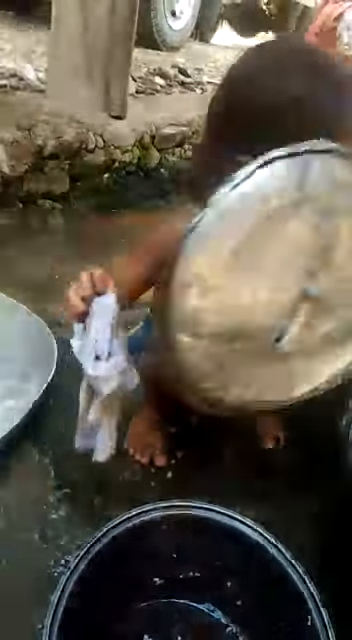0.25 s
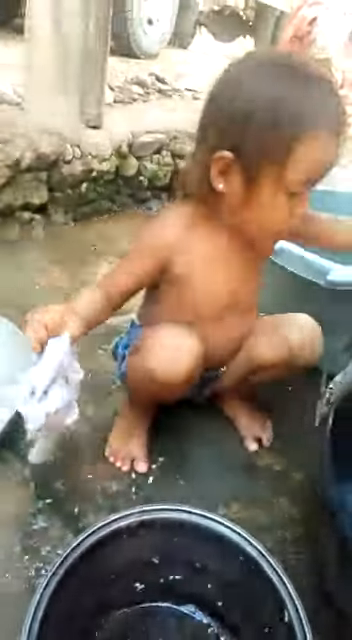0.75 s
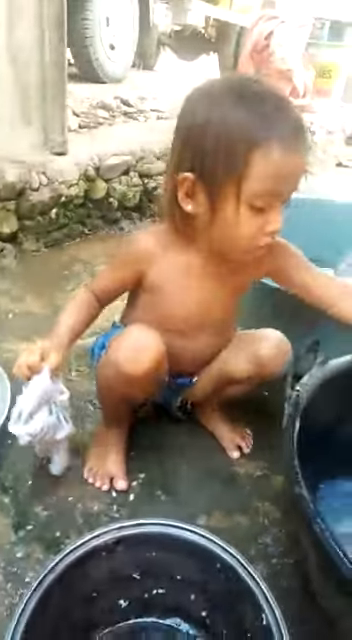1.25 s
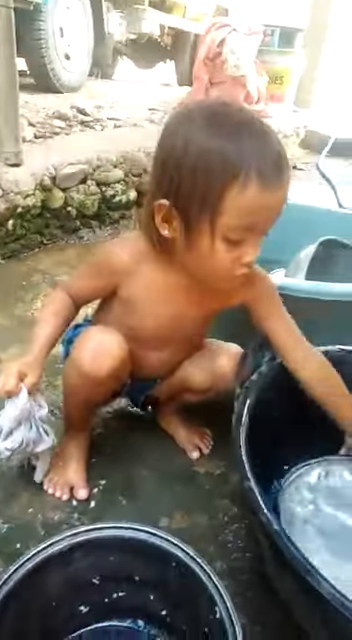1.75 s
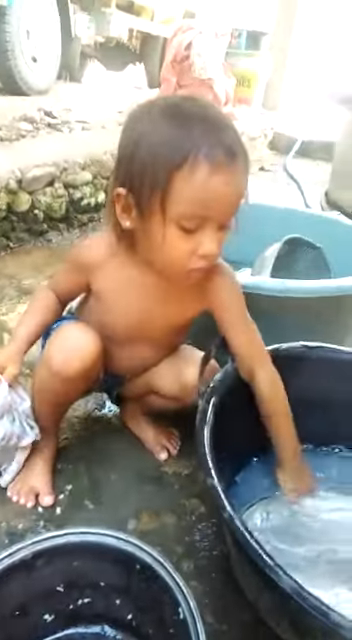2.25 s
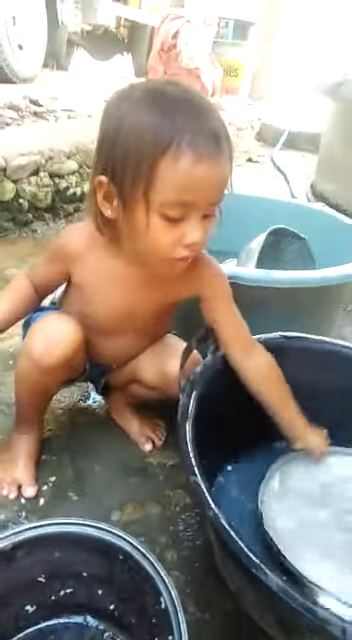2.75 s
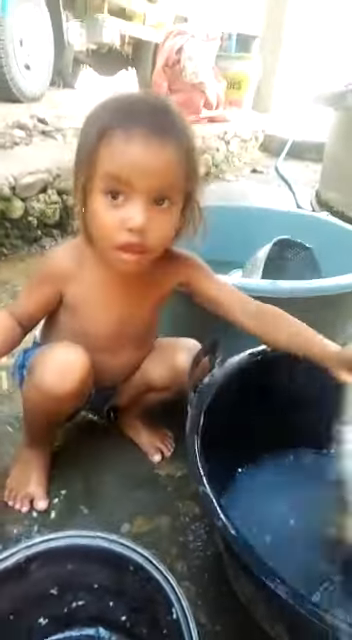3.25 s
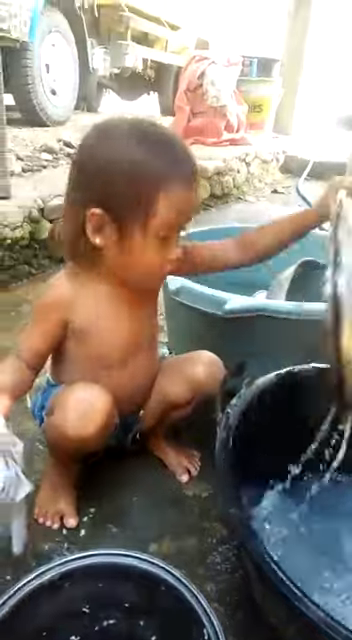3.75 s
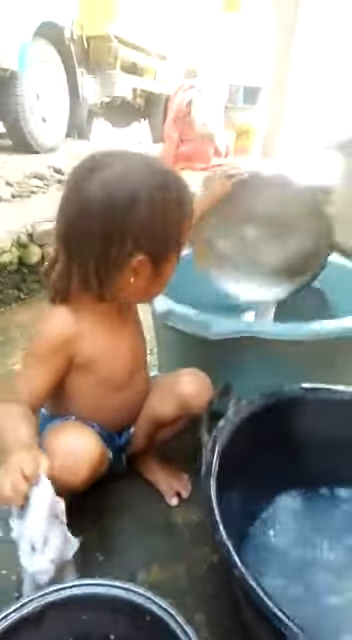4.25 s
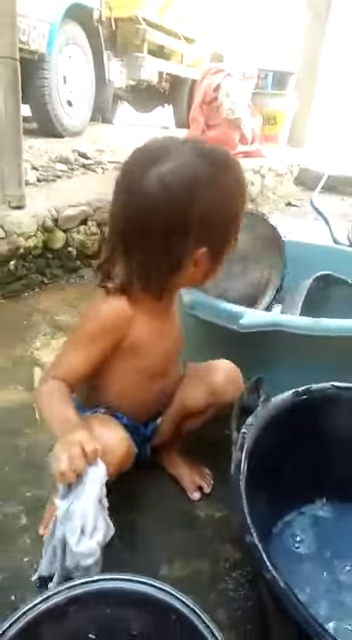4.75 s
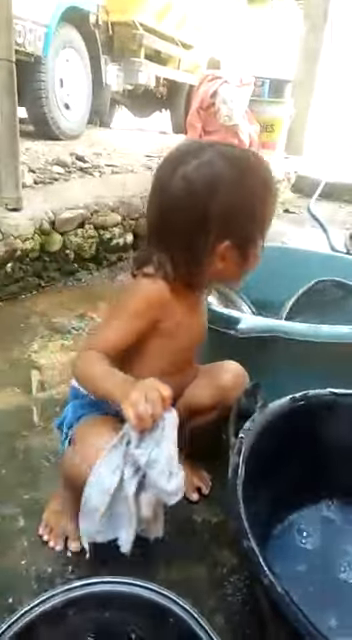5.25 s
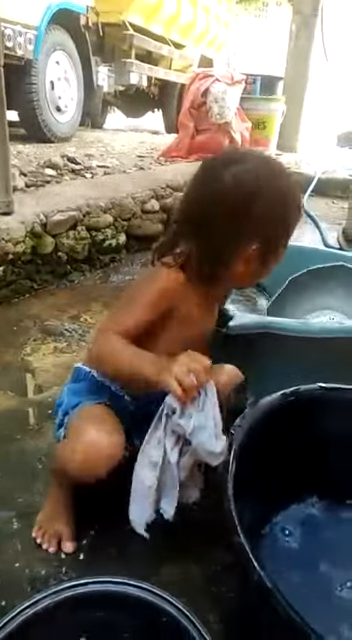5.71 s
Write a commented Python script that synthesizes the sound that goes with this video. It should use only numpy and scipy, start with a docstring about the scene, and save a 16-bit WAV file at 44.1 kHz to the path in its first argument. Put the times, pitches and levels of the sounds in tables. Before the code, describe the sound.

Close phone pickup in an open yard. After a very quiet first second with faint scraping, a thin metal lid knocks sharply on a plastic basin, then drags, squeaks and clinks through water. A quieter patch around three and a half to four seconds holds small squeaks and drips, then harder clanks and scrapes return, the loudest just after five seconds, over a faint outdoor rush.

```python
"""In a yard, near a phone, a thin metal lid is rinsed in plastic basins.
Knocks on rims and pans are bursts of noise coloured by the lid's resonances, with basin thuds, treble cracks and
damped tones. Between them the lid drags through water and along plastic: resonant friction noise, slips and hiss.
Gliding hoarse squeaks, short rough skids, a scrubbing wet cloth and ticking drops lie over a far outdoor rush."""
import sys
import numpy as np
from scipy import signal
from scipy.fft import rfft, irfft, next_fast_len
from scipy.io import wavfile
from scipy.ndimage import uniform_filter1d, map_coordinates

SR = 44100
rng = np.random.default_rng(int(sys.argv[2]) if len(sys.argv) > 2 else 0)


def wav_record(signal):
    """Record a signal, one row per channel, as 16-bit PCM in the file named by sys.argv[1]."""
    frames = np.transpose(np.atleast_2d(signal))
    bounded = np.clip(frames, -1, 1)
    # unit amplitude maps onto the largest positive 16-bit level
    quanta = np.round(bounded * 32767).astype(np.int16)
    wavfile.write(sys.argv[1], SR, quanta)


N = 263718  # samples

# Resonances of the thin lid: (centre_hz, width_hz, level_db)
LID_MODES = [(455, 130, -5.5), (625, 16.7, 1), (732, 46, -3), (910, 56, 0.5), (1096, 160, -3),
             (1270, 95, 2), (1437, 100, -1.5), (1624, 51, 3), (1904, 247, -1), (2210, 276, 0),
             (2540, 147, -1), (2823, 165, -4), (3124, 310, -9)]
# Overall colour of the lid's sound: (frequency_hz, density_db per Hz)
LID_COLOUR = [(60, -75.5), (200, -46), (400, -2), (700, -1), (2000, -4), (2800, -8.5), (4000, -22),
              (9000, -39)]
# Colour of sloshing water and the basin wall: (frequency_hz, density_db per Hz)
SLOSH_COLOUR = [(24, -46), (40, -18.5), (161, -8.5), (220, -8.5), (284, -3.5), (330, 1), (430, -0.5),
                (730, -120)]
# Colour of the scraping hiss: (frequency_hz, density_db per Hz)
HISS_COLOUR = [(1760, -8.5), (3000, -2), (3700, -4), (4330, -5.5), (5920, -2.5), (6790, -1), (9290, -1),
               (14300, -13)]
GRIP_OCT = 0.82  # width of the brightest part of a drag, octaves


def amp(db):
    """Gain of a level in dB."""
    return 10 ** (np.asarray(db) / 20)


def unit(x):
    """x at rms 1."""
    return x / np.sqrt(np.mean(np.abs(x) ** 2) + 1e-20)


def along(points, hz):
    """Curve through (frequency, value) points, straight on a log frequency axis."""
    f, v = np.transpose(points)
    return np.interp(np.log(hz + 1), np.log(f + 1), v)


def wobble(rate):
    """A smooth random curve with `rate` knots a second."""
    knots = rng.standard_normal(int(N * rate / SR) + 4)
    return map_coordinates(knots, [np.arange(N) * rate / SR])


def filtered(x, response):
    """x passed through a complex response of frequency."""
    size = next_fast_len(x.shape[-1] + 4096)
    spectrum = rfft(x, size) * response(np.fft.rfftfreq(size, 1 / SR))
    return irfft(spectrum, size)[..., :x.shape[-1]]


def modes(table, f):
    """Causal response of (centre, width, level) resonances, added with alternating sign."""
    total = 0
    for k, (centre, width, db) in enumerate(table):
        damping = 1j * f * width
        total = total + (-1) ** k * amp(db) * damping / (centre * centre - f * f + damping)
    return total


def hump(hz, centre_hz, octaves):
    """A bell-shaped gain around a centre on a log axis."""
    return np.exp(-.5 * (np.log2((hz + 1) / centre_hz) / octaves) ** 2)


def grainy(depth_db, rate):
    """Noise at rms 1 whose level wanders at random, `rate` knots a second."""
    return unit(amp(depth_db * wobble(rate)) * rng.standard_normal(N))


def burst(gain):
    """Noise of rms 1 with the given gain at each frequency."""
    phase = np.exp(2j * np.pi * rng.random(len(gain)))
    return unit(irfft(gain * phase * rng.rayleigh(size=len(gain))))


def random_patches(shape, wide, long):
    """Random field over bands and frames, smoothed along both, at rms 1."""
    field = uniform_filter1d(rng.standard_normal(shape), size=wide, axis=0)
    return unit(uniform_filter1d(field, size=long, axis=1))


def patchy(x, depth_db, wide, long):
    """x with patches of random gain: single bands come and go."""
    z = signal.stft(x, nperseg=256)[2]
    z = z * amp(depth_db * random_patches(z.shape, wide, long))
    return unit(signal.istft(z, nperseg=256)[1][:N])


def thin(x):
    """A small thin plate radiates hardly any bass: a steep low cut near 260 Hz."""
    return filtered(x, lambda f: (1j * f / (1j * f + 260)) ** 3)


def stroke_db(start, swell, hold, t60):
    """Level of one stroke under its peak: swell, hold, fade."""
    swell_db = 22  # distance under the peak at the start
    t = np.arange(N) / SR - start - swell
    rise = swell_db * (np.maximum(-t, 0) / max(swell, .001)) ** 2
    fade = 60 * np.maximum(t - hold, 0) / max(t60, .02)
    return -np.minimum(rise + fade, 200)


def yard():
    """Far outdoor rush of air and water: coloured noise with a slightly wandering level."""
    # Colour of the rush: (frequency_hz, density_db per Hz)
    yard_colour = [(24, -40), (40, -5), (80, -1.5), (151, -19), (188, -13), (529, -8.5), (629, -8.5),
                   (694, -11.5), (3880, -28), (14300, -33)]
    rush = unit(filtered(rng.standard_normal(N), lambda f: amp(along(yard_colour, f))))
    return amp(-78.5 + 0.45 * wobble(14.0)) * rush


def dragging():
    """Gains of rub, hiss and slosh, and the brightest part, weighted by the power of each stroke."""
    # Floor between strokes: rub_db, bright_hz, hiss_db, slosh_db
    idle_levels = (-79.5, 892, -93.5, -88.5)
    # Drags: (start_s, swell_s, hold_s, t60_s, rub_db, bright_hz, hiss_db, slosh_db)
    drag_strokes = [(0, 0.00067, 0.029, 0.41, -55.5, 1380, -58, -82),
                    (.25, 0.11, 0.017, 0.76, -73, 1390, -92, -85),
                    (1.109, 0.061, 0.055, 0.45, -50, 1390, -57, -62.5),
                    (1.353, 0.031, 0.097, 0.41, -59, 1124, -69, -70),
                    (1.575, 0.019, 0.071, 0.43, -63, 1390, -82, -68),
                    (1.69, 0.038, 0.048, 0.33, -50, 1100, -78, -88),
                    (1.757, 0.013, 0.063, 0.42, -50.5, 1170, -61, -90),
                    (1.968, 0.017, 0.016, 0.31, -43.5, 1123, -67, -63),
                    (2.016, 0.028, 0.019, 0.58, -53.5, 1660, -74, -76),
                    (2.295, 0.057, 0.063, 0.33, -44, 1324, -52, -64),
                    (2.415, 0.048, .05, 0.2, -49, 1450, -51.5, -92),
                    (2.522, 0.017, 0.053, 0.5, -52.5, 1200, -64, -92),
                    (2.67, 0.056, 0.042, 0.55, -55, 920, -72, -72),
                    (2.778, 0.08, 0.034, 0.22, -47.5, 1334, -55, -79),
                    (2.889, 0.016, 0.048, 0.38, -46.5, 1510, -53.5, -80),
                    (3.061, .03, 0.036, .2, -48, 804, -70, -68),
                    (3.172, 0.048, .16, 0.45, -60.5, 1300, -70.5, -90),
                    (3.343, 0.074, .01, 1.5, -51, 1760, -60.5, -94),
                    (3.47, 0.075, 0.049, 0.94, -61.5, 1280, -56.5, -71),
                    (3.58, .05, .11, 0.22, -60, 1910, -60.5, -85),
                    (4.03, 0.033, .05, 0.38, -64, 1070, -73.5, -96),
                    (4.114, 0.035, 0.11, 0.13, -77, 1410, -93, -87),
                    (4.332, 0.027, .05, .2, -81, 1570, -77.5, -79),
                    (4.413, 0.013, 0.045, 0.25, -44.5, 1600, -57, -83),
                    (4.653, 0.022, 0.034, 0.67, -48.5, 910, -61, -83),
                    (4.815, 0.017, 0.029, 0.48, -44.5, 1430, -50, -68),
                    (4.969, 0.018, 0.015, 0.5, -61, 850, -80, -73),
                    (5.098, 0.055, 0.086, 0.89, -45, 1460, -67.5, -69),
                    (5.172, 0.061, 0.058, 0.43, -38.5, 990, -54, -59),
                    (5.386, 0.041, 0.044, 0.69, -54, 1600, -69, -69),
                    (5.505, 0.036, 0.072, 0.85, -48.5, 1230, -65, -63.5),
                    (5.598, 0.037, 0.033, 1.8, -44.5, 1022, -59.5, -69),
                    (5.873, 0.021, 0.017, .12, -47, 1800, -62, -72),
                    (5.917, .015, .05, .4, -48, 1380, -62.5, -66)]
    hiss_steeper = 1.5  # the hiss swells and fades by more dB than the rub
    rub_db, hz, hiss_db, slosh_db = idle_levels
    rub, hiss, slosh = (np.full(N, amp(2 * db)) for db in (rub_db, hiss_db, slosh_db))  # powers
    bright = rub * hz
    for *shape, rub_db, hz, hiss_db, slosh_db in drag_strokes:
        db = stroke_db(*shape)
        power = amp(2 * (rub_db + db))
        rub, bright = rub + power, bright + power * hz
        hiss = hiss + amp(2 * (hiss_db + hiss_steeper * db))
        slosh = slosh + amp(2 * (slosh_db + db))
    return np.sqrt(rub), np.sqrt(hiss), np.sqrt(slosh), bright / rub


def slips(bright_hz, count):
    """Stick-slip: short damped tones, bending a little, scattered around the brightest part."""
    when, spread, size, bend = rng.random(count), *rng.standard_normal((3, count))
    start, t = (when * N).astype(int), np.arange(700) / SR
    hz = np.clip(bright_hz[start] * 2 ** (0.576 * spread * GRIP_OCT), 300, 3400)[:, None]
    cycles = hz * t * (1 + 4 * bend[:, None] * t)
    decay = amp(4.3 * size[:, None] - 60 * hz * t / 22)  # 60 dB down after 22 nominal cycles
    grain = decay * (1 - np.exp(-t / 0.00087)) * np.sin(2 * np.pi * cycles)
    places = start[:, None] + np.arange(700)
    return unit(np.bincount(places.ravel(), grain.ravel(), N)[:N])


def drone(rub_gain):
    """Scraping keeps the loaded basin's lowest air and wall resonances humming."""
    loaded_s, hum_db = 4.6, -11.5  # the lid reaches the loaded basin; hum relative to the rub gain
    basin_modes = [(429, 80, 1), (491, 76, -2)]  # (centre_hz, width_hz, level_db)
    hum = unit(filtered(grainy(5.9, 22), lambda f: modes(basin_modes, f) ** 2))
    return amp(hum_db) * rub_gain * (np.arange(N) / SR > loaded_s) * hum


def rubbing(bright_hz):
    """Friction noise through the lid's modes, its brightest part moving with the grip, plus slips."""
    rub = filtered(grainy(1.5, 160), lambda f: (0.55 + np.abs(modes(LID_MODES, f))) * amp(along(LID_COLOUR, f)))
    hz, t, z = signal.stft(rub, SR, nperseg=512)
    now = np.minimum((t * SR).astype(int), N - 1)
    z = z * (0.33 + hump(hz[:, None], bright_hz[now], GRIP_OCT))
    z = z * amp(3.5 * random_patches(z.shape, wide=2, long=9))  # narrow bands come and go
    z = z / uniform_filter1d(np.sqrt(np.mean(np.abs(z) ** 2, 0)), 15)  # even out the level
    steady = unit(signal.istft(z, SR, nperseg=512)[1][:N])
    return 0.7 * steady + 0.54 * slips(bright_hz, count=900)


def drag():
    """The lid drags: friction feeds its modes, water sloshes, plastic hisses and the loaded basin hums."""
    rub_gain, hiss_gain, slosh_gain, bright_hz = dragging()
    rub = rubbing(bright_hz)
    slosh = unit(filtered(grainy(2.5, 20), lambda f: amp(along(SLOSH_COLOUR, f))))
    hiss = filtered(grainy(1.6, 600), lambda f: amp(along(HISS_COLOUR, f)))
    hiss = patchy(hiss, depth_db=2.2, wide=8, long=5)
    slip_db = 2.47 * wobble(30)  # uneven friction
    hiss_db = 0.42 * slip_db + 1.9 * wobble(25)  # the hiss partly follows it
    lid = thin(rub_gain * amp(slip_db) * rub)
    return lid + slosh_gain * slosh + hiss_gain * amp(hiss_db) * hiss + drone(rub_gain)


def knocks():
    """Each contact rattles the lid near its centre pitch, thuds in the basin and cracks in the treble."""
    # Knocks: (start_s, level_db, centre_hz, base_decay_s, thud_db, crack_db); the last two relative to the level
    knock_list = [(0.009, -50, 1410, 0.15, -26, -25), (0.112, -54.5, 940, 0.21, -15.5, -19),
                  (0.203, -54, 1290, 0.16, -30, -32), (0.29, -59, 945, 0.2, -22, -25),
                  (0.364, -44, 1330, 0.037, -40, -20.5), (0.42, -55, 923, 0.13, -32, -35),
                  (1.005, -15.5, 590, 0.14, -23, -25), (1.408, -19.5, 1130, 0.12, -22.5, -18.5),
                  (1.434, -36, 1290, 0.09, -18, -4.5), (1.588, -30, 590, 0.093, -22, -29),
                  (1.723, -41, 1130, 0.32, -38, -45), (1.792, -20, 1040, 0.077, -62, -16),
                  (1.982, -16, 780, 0.13, -24.5, -22), (2.312, -41, 1060, 1, -23, -15),
                  (2.595, -41, 1550, 0.14, -52, -31), (2.636, -51, 1930, 0.19, -49, -41),
                  (2.716, -18, 950, 0.1, -28.5, -20), (2.889, -22, 1280, 0.099, -54, -22),
                  (2.901, -22.5, 1160, 0.073, -25, -7), (2.914, -24, 1900, 0.13, -39, -15),
                  (3.082, -39, 1080, 0.18, -9, -27), (3.109, -38, 1090, 0.091, -17, -22),
                  (3.377, -34, 2200, 0.049, -54, -17), (3.415, -54, 2000, 0.036, -52, -24),
                  (3.431, -46, 1770, 0.18, -52, -26), (3.467, -30, 1900, 0.2, -42, -6.5),
                  (4.074, -53, 980, 0.18, -59, -38), (4.149, -53, 1620, 0.06, -35, -20),
                  (4.419, -36.5, 1300, 0.14, -24, -9), (4.425, -19, 1310, 0.11, -29.5, -14),
                  (4.437, -17, 1630, 0.17, -38, -14), (4.668, -22.5, 676, 0.18, -17.5, -24),
                  (4.777, -30, 750, 0.23, -15.5, -12), (4.83, -18.5, 1450, 0.19, -30, -17),
                  (4.898, -37.5, 1410, 0.19, -16.5, -9.5), (5.106, -37, 1900, 0.1, -19.5, -27.5),
                  (5.237, -10.5, 800, 0.19, -33.5, -16.5), (5.329, -23.5, 1040, 0.18, -34, -18),
                  (5.641, -23.5, 840, 0.22, -32, -13.5), (5.666, -24.5, 1120, 0.087, -23, -14.5),
                  (5.927, -29, 1430, 0.18, -19, -24)]
    # Colour of the crack: (frequency_hz, density_db per Hz)
    crack_colour = [(1800, 0), (3000, -1), (3800, -9), (6000, -5), (8000, -9), (10000, -12), (14300, -24.5)]
    attack_s, ring_oct, thud_tilt_db = 0.0025, 0.52, 2.5  # base attack; ring width; thud tilt per octave downward
    metal, basin, t = np.zeros(N + SR), np.zeros(N + SR), np.arange(12000) / SR
    f = np.fft.rfftfreq(len(t), 1 / SR)
    lid = np.abs(modes(LID_MODES, f)) * amp(along(LID_COLOUR, f))
    edge = amp(along(crack_colour, f))
    wall = amp(along(SLOSH_COLOUR, f) + thud_tilt_db * np.log2(300 / (f + 30)))

    def dying(time, swell):
        """Soft onset, then 60 dB of decay in `time` seconds."""
        return amp(-60 * t / time) * (1 - np.exp(-t / max(swell * attack_s, 1e-4)))

    for s, db, hz, decay_s, thud_db, crack_db in knock_list:
        ring = burst(lid * (0.63 + hump(f, hz, ring_oct)))
        # fast modes over a slower rattle
        blow = amp(-6.5) * ring * (dying(0.28 * decay_s, 2.8) + 0.39 * dying(1.554 * decay_s, 1.6))
        blow += amp(crack_db) * burst(edge) * (1.29 * dying(0.019, 0.8) + 0.57 * dying(1.37 * decay_s, 1.2))
        metal[round(s * SR):][:len(t)] += amp(db) * blow
        early = max(round((s - .007) * SR), 0)  # the soft wall yields first
        basin[early:][:len(t)] += amp(db + thud_db) * burst(wall) * dying(1.49 * decay_s, 0.67)
    return thin(metal[:N]) + basin[:N]


def notes():
    """Air trapped under the lid or one strong mode of a pan: a damped, slightly unsteady tone."""
    # Pitched clonks and gulps: (start_s, pitch_hz, level_db, t60_s)
    note_list = [(0.11, 940, -63, 0.079), (0.362, 753, -53, 0.049), (0.364, 1474, -43, 0.054),
                 (0.419, 913, -62.5, 0.059), (0.998, 384, -39, 0.022), (1.005, 632, -28.5, 0.06),
                 (1.006, 1950, -33.5, 0.04), (1.006, 1304, -34.5, 0.082), (1.361, 2210, -49, 0.045),
                 (1.372, 1306, -46, 0.093), (1.402, 450, -49, 0.02), (1.408, 1295, -27.5, 0.024),
                 (1.409, 622, -31.5, 0.05), (1.721, 1180, -42.5, 0.077), (1.731, 770, -46, 0.081),
                 (1.792, 1180, -27.5, 0.013), (1.977, 439, -35.5, 0.068), (1.985, 712, -33.5, 0.06),
                 (2.25, 2220, -43.5, 0.042), (2.376, 1182, -40.5, 0.13), (2.593, 1300, -46, 0.03),
                 (2.594, 1900, -40, 0.028), (2.635, 1980, -39, 0.013), (2.716, 1043, -29, 0.034),
                 (2.718, 735, -30, 0.042), (2.9, 1614, -30, 0.055), (2.901, 1035, -29.5, 0.084),
                 (3.255, 988, -51, 0.078), (3.254, 2650, -55, 0.077), (3.377, 965, -46.5, 0.1),
                 (3.41, 1213, -42.5, 0.071), (3.431, 1763, -40.5, 0.056), (3.511, 1180, -45, 0.17),
                 (3.818, 1000, -62, 0.032), (4.059, 1438, -51, 0.055), (4.067, 853, -45.5, 0.051),
                 (4.074, 1106, -35, 0.047), (4.151, 2060, -64.5, 0.02), (4.436, 1684, -23, 0.044),
                 (4.438, 1240, -29.5, 0.034), (4.658, 450, -35, 0.03), (4.666, 781, -31, 0.046),
                 (4.777, 750, -36, 0.038), (4.823, 281, -37.5, 0.14), (4.829, 997, -33, 0.045),
                 (4.832, 1500, -34, 0.074), (4.894, 276, -47, 0.12), (5.005, 825, -56, 0.035),
                 (5.233, 798, -24, 0.046), (5.242, 504, -28.5, 0.17), (5.249, 1140, -29, 0.046),
                 (5.323, 1043, -35.5, 0.18), (5.36, 443, -44, 0.072), (5.438, 422, -52, 0.094),
                 (5.468, 415, -49, 0.11), (5.528, 858, -44.5, 0.07), (5.528, 417, -48, 0.12),
                 (5.571, 1256, -40.5, 0.054), (5.572, 2406, -41.5, 0.047), (5.637, 899, -32, 0.12),
                 (5.666, 475, -37, 0.14), (5.885, 305, -48.5, 0.11), (5.917, 308, -46, 0.21),
                 (5.925, 1400, -40, 0.047)]
    glide, rise = 0.022, 0.042  # upward glide as a share of the pitch; onset as a share of the t60
    out, t = np.zeros(N + SR), np.arange(8192) / SR
    for s, hz, db, t60 in note_list:
        pitch = hz * (1 + glide * (np.tanh(t / (0.33 * t60)) - .3))
        shape = amp(-60 * t / max(t60, .01)) * (1 - np.exp(-t / max(rise * t60, 3e-4)))
        tone = np.sin(2 * np.pi * np.cumsum(pitch) / SR)
        out[round(s * SR):][:len(t)] += amp(db) * shape / shape.max() * tone
    unsteady = out[:N] * amp(1.17 * wobble(90))
    return filtered(unsteady, lambda f: (1j * f / (1j * f + 120)) ** 3)  # low cut


def drops():
    """Drops tick on the ground: tiny bursts of spray noise around a pitch."""
    # Drops: (start_s, level_db before a common 7 dB cut, centre_hz)
    drop_list = [(0.343, -59.5, 6100), (0.529, -55.5, 8860), (0.5385, -51.5, 5870), (0.5934, -55, 10700),
                 (0.601, -45.5, 7950), (0.677, -62, 6040), (1.5294, -62, 5340), (1.5653, -62, 10470),
                 (1.62, -59, 9000), (1.72, -60, 13600), (1.793, -32, 6900), (1.82, -43, 8400),
                 (1.9297, -55.5, 5000), (1.973, -45, 6900), (2.092, -54, 7500), (2.0713, -49, 7260),
                 (2.5078, -34, 5470), (2.902, -26.5, 6950), (2.915, -28.5, 8100), (3.049, -51.5, 6550),
                 (3.139, -63, 11600), (3.112, -50, 6300), (3.28, -53, 8000), (3.3165, -47, 10200),
                 (3.328, -45, 10000), (3.36, -49, 7500), (3.42, -45, 8000), (3.6756, -41.5, 6470),
                 (3.6837, -33, 11600), (3.7124, -50, 7300), (3.7194, -49, 12100), (3.7264, -50.5, 7280),
                 (3.7948, -52, 6760), (3.9933, -65, 9500), (4.0612, -53, 5690), (4.0786, -52, 7810),
                 (4.1225, -46.5, 6940), (4.2137, -53, 6540), (4.2488, -44.5, 8400), (5.7473, -41.5, 6550)]
    # Colour of the spray: (frequency_hz, density_db per Hz)
    spray_colour = [(3500, -56), (4800, -17), (6000, -8), (13000, -7.5)]
    out, t = np.zeros(N + SR), np.arange(2048) / SR
    decay = amp(-60 * t / 0.018) + 0.24 * amp(-60 * t / 0.14)  # a tick and its faint tail
    for s, db, hz in drop_list:
        colour = lambda f: amp(along(spray_colour, f)) * (0.3 + hump(f, hz, 0.22))
        spray = unit(filtered(rng.standard_normal(len(t)), colour))
        out[round(s * SR):][:len(t)] += amp(db - 7.0) * spray * decay
    return out[:N]


def squeaks():
    """A gliding tone that comes in short uneven beads, inside a broader rasp that follows its pitch."""
    # Hoarse squeaks: (start_s, swell_s, hold_s, t60_s, level_db, first_hz, last_hz, rasp share of the power 0-1)
    squeak_list = [(0.926, .025, .055, .03, -74, 1680, 1920, 0.2),
                   (1.112, 0.021, 0.044, 0.11, -59, 1765, 1730, .5),
                   (1.201, 0.016, 0.039, 0.17, -56, 1614, 1610, 0.2),
                   (1.642, .015, .03, .05, -58.5, 2000, 1680, .4),
                   (1.668, .02, 0.034, 0.095, -61, 2040, 2000, .9),
                   (1.877, 0.036, .07, .05, -54.5, 1750, 1810, 0.17),
                   (2.02, 0.01, 0.013, 0.56, -54, 1840, 1904, .15),
                   (2.594, 0.013, 0.039, .06, -50, 1556, 1717, 0.6),
                   (2.637, 0.038, 0.034, 0.056, -51.5, 1900, 2090, 0.9),
                   (2.73, 0.017, 0.093, .08, -58, 2030, 2130, 0.55),
                   (2.829, .04, .02, .05, -52, 1640, 1730, 0.2),
                   (2.962, 0.017, 0.12, .06, -66, 1780, 1673, 0),
                   (3.191, 0.023, 0.041, .04, -61, 1285, 1157, 0.25),
                   (3.423, 0.012, 0.058, .06, -49, 1730, 1780, 0.2),
                   (3.667, 0.058, 0.038, 0.37, -52, 1916, 1940, 0.64),
                   (3.859, .03, 0.095, .15, -76, 1900, 1860, 0.35),
                   (3.977, .04, 0.055, 0.44, -76.5, 2740, 2660, .6),
                   (4.14, .014, .005, 0.089, -54.5, 1650, 1590, 0),
                   (4.167, 0.023, 0.119, 0.2, -63, 1538, 1460, 0.75),
                   (4.336, 0.034, 0.0358, .05, -55, 1565, 2250, 0.1),
                   (4.378, 0.025, 0.13, 0.11, -54, 2150, 2030, 0.74),
                   (4.542, 0.047, 0.022, 0.052, -52.5, 1950, 1650, 0.36),
                   (4.603, 0.014, .045, .04, -54, 1640, 1700, .4),
                   (5.105, 0.07, 0.072, 0.093, -53, 2055, 1980, 0.4),
                   (5.416, 0.032, 0.1, .05, -54.5, 1876, 1885, .3),
                   (5.743, 0.014, 0.022, 0.081, -58.5, 2050, 2050, .7)]
    out = np.zeros(N)
    flutter = amp(2.2 * wobble(35))
    beads = unit(wobble(100) + 1j * wobble(90) + 0.96) * flutter
    rasp = unit(wobble(400) + 1j * wobble(410)) * flutter  # faster wobble, broader band
    for s, swell, hold, t60, db, first_hz, last_hz, share in squeak_list:
        way = np.interp(np.arange(N) / SR, [s, s + swell + hold + t60 / 3], [0, 1])
        hz = first_hz + (last_hz - first_hz) * np.sin(np.pi / 2 * way)  # the glide levels off
        drive = np.sqrt(1 - share) * beads + np.sqrt(share) * rasp
        tone = np.real(drive * np.exp(2j * np.pi * np.cumsum(hz) / SR))
        out += amp(db + stroke_db(s, swell, hold, t60)) * tone
    return out * np.sqrt(2)  # the real part holds half the power


def skids():
    """The rim slides a finger's width on plastic: a rough burst that holds, then stops dead."""
    # Skids: (start_s, level_db, centre_hz, hiss_db relative to the rough part)
    skid_list = [(1.36, -45.5, 1560, -7.5), (1.712, -61, 2900, -29), (1.745, -58, 2700, -26),
                 (2.249, -45.5, 2010, -56), (2.99, -51.5, 2800, -25), (3.02, -58, 3200, -25),
                 (3.093, -43, 900, -23), (3.249, -47.5, 2230, -26), (5.159, -50, 1970, -25),
                 (5.53, -42.5, 870, -21), (5.567, -36, 1300, -22), (5.755, -64, 1200, -18),
                 (5.8, -49.5, 2500, -16), (5.839, -47.5, 1400, -8.5), (5.889, -43.5, 1940, -29),
                 (5.912, -51, 3600, -18)]
    hold_s, width_oct = 0.028, 0.33
    out, t = np.zeros(N + SR), np.arange(4096) / SR
    f = np.fft.rfftfreq(len(t), 1 / SR)
    fall_db = 60 * t / 0.14 + 60 * np.maximum(t - hold_s, 0) / 0.051  # steeper after the hold
    shape = (1 - np.exp(-t / 0.0022)) * amp(-fall_db)
    for s, db, hz, hiss_db in skid_list:
        rough = burst(np.abs(modes(LID_MODES, f)) * (0.13 + hump(f, hz, width_oct)) * hump(f, 1000, 3.2))
        hiss = burst(amp(along(HISS_COLOUR, f)))
        out[round(s * SR):][:len(t)] += amp(db) * shape * (rough + amp(hiss_db) * hiss)
    return thin(out[:N])


def scrub():
    """Wet fibres rasp over metal and hiss in a few high resonances."""
    # Cloth strokes: (start_s, swell_s, hold_s, t60_s, level_db, upper_fizz_db)
    scrub_strokes = [(2.39, 0.076, 0.052, 0.066, -42.5, -49.5), (2.782, 0.043, 0.054, .05, -48, -53)]
    # Resonances of the cloth on metal: (centre_hz, width_hz, level_db)
    cloth_modes = [(3600, 1200, -5.5), (4850, 360, 4), (5630, 870, 5)]
    # Resonances of the upper fizz: (centre_hz, width_hz, level_db)
    fizz_modes = [(7220, 1300, -1.5), (9600, 1500, 3.5)]
    rasp = grainy(3.3, 220)
    low, high = (unit(filtered(rasp, lambda f: np.abs(modes(band, f)) ** 1.6))
                 for band in (cloth_modes, fizz_modes))
    out = np.zeros(N)
    for *shape, db, fizz_db in scrub_strokes:
        out += amp(stroke_db(*shape)) * (amp(db) * low + amp(fizz_db) * high)
    return out


def scene():
    """All sources reach both ports alike in the bass; in the treble each port hears its own scattered part."""
    # Unlike part of the two ports: (frequency_hz, level_db)
    apart_curve = [(2500, -81), (3600, -62), (5000, -25.5), (7000, -4.5), (13000, -2.5)]
    mid = yard() + drag() + knocks() + notes() + drops() + squeaks() + skids() + scrub()
    z = signal.stft(mid, nperseg=128)[2]
    scattered = signal.istft(z * np.exp(2j * np.pi * rng.random(z.shape)), nperseg=128)[1][:N]
    side = filtered(scattered, lambda f: amp(along(apart_curve, f)))
    return np.array([mid + side, mid - side])


def record(dry):
    """The phone drops the deepest bass, has a narrow dip in the low middle and keeps nothing above its band limit."""
    bass = lambda f: 1 / (1 + (36 / (f + 1)) ** 4)
    dip = lambda f: 1 - 0.76 / (1 + ((f - 372) / 25) ** 2)
    top = lambda f: 1 / (1 + (f / 14300) ** 200)  # band limit in Hz
    return filtered(dry, lambda f: bass(f) * dip(f) * top(f))


dry = scene()
out = record(dry)
wav_record(out)
```